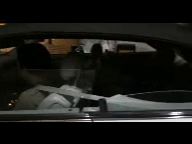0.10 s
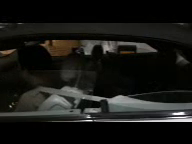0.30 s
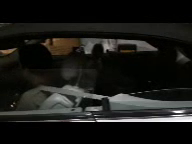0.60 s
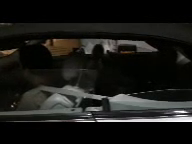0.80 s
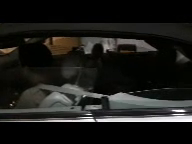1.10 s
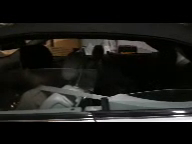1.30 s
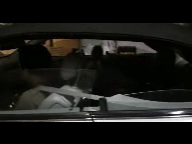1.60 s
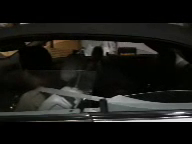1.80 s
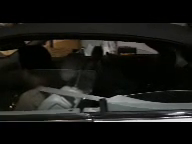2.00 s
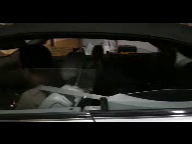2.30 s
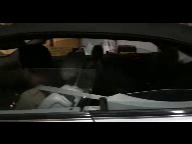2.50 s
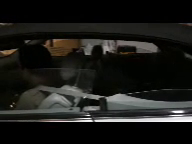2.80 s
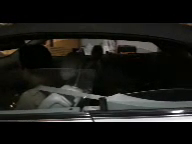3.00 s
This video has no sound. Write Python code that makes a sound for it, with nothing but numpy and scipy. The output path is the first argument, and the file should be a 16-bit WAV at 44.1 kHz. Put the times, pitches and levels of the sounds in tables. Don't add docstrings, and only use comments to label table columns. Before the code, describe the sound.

Silence until 0.13 s, then a quick fade into the steady whir of a car's folding roof motor: low hum, grainy gear chatter and a thin whine creeping upward. Dull linkage knocks at about 1.25 s, more with low scrapes around 1.8-2.1 s. A latch rattles at 2.96 s; the frame thuds at 3.05 s, bouncing briefly while the motor continues. Close, outdoors, small camera microphone.

```python
import sys
import numpy as np
from scipy import signal
from scipy.fft import rfft, irfft
from scipy.io import wavfile
from scipy.ndimage import uniform_filter1d

SR = 44100
rng = np.random.default_rng(int(sys.argv[2]) if len(sys.argv) > 2 else 0)


def output_pcm(signal):
    pcm = np.clip(np.atleast_2d(signal).T, -1, 1) * 32767
    wavfile.write(sys.argv[1], SR, np.round(pcm).astype(np.int16))


def gain_from_db(level_db):
    decades = np.asarray(level_db, float) / 20
    return 10 ** decades


N = 140679
T = np.arange(N) / SR

SHAFT_HZ = 40.6
# order (multiple of the shaft rate), level in dB rms.
SHAFT_ORDERS = [(1, -59), (2, -53), (3, -54.5), (4, -57), (6, -55), (7, -67.5), (12, -55), (15, -69)]
# frequency in Hz, level in dB rms.
HOUSING_TONES = [(212.5, -59.5), (257.5, -47.5), (425, -53.5), (660.5, -52.5), (1405, -51), (1754, -51.5)]
# time in seconds, pitch in Hz.
MESH_PITCH = [(0, 531), (.5, 531.5), (.9, 533.5), (1.5, 536.5), (2.1, 541.5), (2.45, 546), (3.19, 551)]
# order, time of greatest level in seconds, spread in seconds, level in dB rms.
MESH_PARTIALS = [(1, 2.42, 0.46, -49), (2, 1.8, 1, -52.5), (4, 0.99, 0.79, -52), (6, 1.4, 0.44, -57.5),
                 (11, 0.34, 0.2, -65), (11, 1.15, .2, -70)]
# frequency in Hz, spectral level in dB.
RUSH_SPECTRUM = [(30, -41), (70, -14.5), (200, -9), (600, -9.5), (1800, -7.5), (4600, -22), (5050, -27),
                 (9000, -32)]
# frequency in Hz, width in Hz, level in dB rms.
PANEL_MODES = [(271.3, 42, -50.5), (366, 39, -55), (496.2, 30.4, -49.5), (650.4, 45, -59), (3120, 680, -52),
               (893, 51, -57.5), (1241, 126, -45.5), (1382, 167, -43.5), (1644, 125, -45), (1802, 104, -44),
               (2153, 120, -52.5), (6960, 1300, -58.5), (8200, 970, -64)]
RUSH_DB, SWELL_DB, FLICKER_DB = -38, 0.74, 0.77
TICK_SPREAD_DB = 2.0
# start in seconds, length in seconds, level in dB, frequency in Hz, width in Hz.
JOINT_SCRAPES = [
    (1.76, 0.17, -47.5, 2900, 350),
    (1.895, 0.046, -38, 200, 260),
    (1.28, .05, -50, 4300, 300),
    (1.1, 0.1, -38, 220, 330),
    (1.78, 0.21, -42, 200, 170),
    (2.09, 0.092, -42, 92, 100),
    (2.956, .025, -42, 4650, 250),
    (2.958, 0.022, -41, 1200, 820),
    (3.04, 0.031, -30, 1850, 490),
    (3.041, 0.035, -30.5, 660, 100),
]
# start in seconds, level in dB, frequency in Hz, 60 dB decay in seconds, contact time in seconds.
LINKAGE_KNOCKS = [(1.243, -27.5, 400, 0.088, 0.0063), (1.3, -38.5, 400, 0.14, .008),
                  (1.272, -26.5, 183, 0.069, 0.0062), (1.847, -29.5, 94.7, 0.22, 0.0095),
                  (1.85, -35.5, 304, 0.14, 0.0052), (1.87, -36, 178, 0.087, .01),
                  (1.891, -29, 59.5, 0.14, 0.023), (1.94, -35.5, 85, 0.18, 0.015),
                  (1.98, -43, 64.7, 0.27, .015), (2.02, -35, 119, 0.098, 0.0094),
                  (2.12, -31.5, 253, 0.079, 0.0056), (1.245, -39, 230, .12, .008),
                  (1.99, -41, 50, 0.22, 0.022), (2.111, -43, 79, 0.24, 0.017),
                  (3.095, -30, 126.3, .2, .015), (3.14, -27, 129.4, .2, 0.015),
                  (3.165, -28, 120, 0.18, .01), (3.165, -29, 287, .12, 0.0092),
                  (3.115, -29, 308, .12, .008)]
RATTLE_START_S, RATTLE_LENGTH_S, RATTLE_DB = 2.957, 0.057, -33
# frequency in Hz, width in Hz, level in dB.
LATCH_MODES = [(610, 61, 5), (886, 370, -1.5), (1400, 490, 7), (2350, 660, -24), (4400, 210, -10),
               (5900, 300, -23)]
# frequency in Hz, level in dB, 60 dB decay in seconds.
FRAME_MODES = [(129.2, -7.5, 0.24), (153.8, 3.5, 0.13), (172, -3, 0.048), (217, -4.5, 0.23),
               (261.7, -1.5, 0.17), (307.7, -4, 0.18), (340.6, -7, 0.2), (400, -8.5, 0.25),
               (532, -10, 0.16), (628, -7, .1), (712, -12.5, 0.068), (891, -11, 0.091), (1067, -11.5, .06),
               (1280, -13, 0.061)]
# start in seconds, level in dB.
IMPACTS = [
    (3.041, -22.5),
    (3.048, -15.5),
    (3.059, -24.5),
    (3.075, -23.5),
    (3.106, -33.5),
    (3.122, -29.5),
    (3.17, -38),
]


def unit(x):
    return x / np.sqrt(np.mean(x ** 2))


def band(x, hz, width):
    return signal.lfilter(*signal.iirpeak(hz, hz / width, fs=SR), x)


def walk(rate):
    hold = int(SR / rate)
    steps = np.repeat(rng.standard_normal(N // hold + 1), hold)
    return 1.46 * uniform_filter1d(uniform_filter1d(steps, hold), hold)[:N]


def decay(u, t60):
    return np.exp(-np.log(1000) * u / t60)


def ring(start, hz, t60, contact, phase=0.):
    first = int(start * SR) + 1
    u = T[first:first + SR // 2] - start
    envelope = (1 - np.exp(-u / contact)) * decay(u, t60)
    out = np.zeros(N)
    out[first:first + len(u)] = envelope * np.sin(2 * np.pi * hz * u + phase)
    return out


def chatter():
    return rng.standard_normal(N) * gain_from_db(TICK_SPREAD_DB * rng.exponential(size=N))


def shaft():
    turn = 2 * np.pi * np.cumsum(SHAFT_HZ * (1 + 0.0017 * walk(1.866))) / SR
    out = 0
    for order, db in SHAFT_ORDERS:
        level = np.sqrt(2) * gain_from_db(db + 1.7 * walk(5.03))
        out = out + level * np.sin(order * turn + rng.uniform(0, 2 * np.pi))
    return out


def housing():
    out = 0
    for hz, db in HOUSING_TONES:
        level = np.sqrt(2) * gain_from_db(db + 2.18 * walk(14))
        out = out + level * np.sin(2 * np.pi * np.cumsum(hz + 4.98 * walk(16)) / SR)
    return out


def whine():
    hz = np.interp(T, *np.array(MESH_PITCH).T) * (1 + .0006 * walk(8))
    turn = 2 * np.pi * np.cumsum(hz) / SR
    out = 0
    for order, peak_s, spread_s, db in MESH_PARTIALS:
        shading = np.exp(-((T - peak_s) / spread_s) ** 4)
        out = out + np.sqrt(2) * gain_from_db(db + walk(12)) * shading * np.sin(round(order) * turn)
    return out


def gears():
    f = np.fft.rfftfreq(N, 1 / SR) + 1
    hz, db = np.array(RUSH_SPECTRUM).T
    spectrum = rfft(chatter()) * gain_from_db(np.interp(np.log(f), np.log(hz), db))
    rush = 0
    for octave in range(-1, 10):
        weight = np.clip(1 - abs(np.log2(f / 40) - octave), 0, 1)
        rush = rush + gain_from_db(FLICKER_DB * walk(12)) * irfft(spectrum * weight, N)
    panels = 0
    for hz, width, db in PANEL_MODES:
        wide = 1.38 * width
        tone = unit(band(band(chatter(), hz, wide), hz, wide))
        panels = panels + gain_from_db(db + FLICKER_DB * walk(6.08)) * tone
    return gain_from_db(SWELL_DB * walk(3.07)) * (gain_from_db(RUSH_DB) * unit(rush) + panels)


def scrapes():
    out = 0
    for start, length, db, hz, width in JOINT_SCRAPES:
        swell = np.sin(np.pi * np.clip((T - start) / length, 0, 1))
        out = out + gain_from_db(db) * unit(band(chatter(), hz, width)) * swell
    return out


def knocks():
    return sum(2 * gain_from_db(db) * ring(start, hz, t60, contact)
               for start, db, hz, t60, contact in LINKAGE_KNOCKS)


def rattle():
    u = (T - RATTLE_START_S) / RATTLE_LENGTH_S
    ticks = unit(chatter() * gain_from_db(walk(200)))
    burst = ticks * np.clip(np.minimum(u * 20, (1.4 - u) / 0.9), 0, 1)
    latch = sum(gain_from_db(db) * band(burst, hz, width) * np.sqrt(SR / 4 / width)
                for hz, width, db in LATCH_MODES)
    return gain_from_db(RATTLE_DB) * latch / 2


def landing():
    out = 0
    for start, db in IMPACTS:
        draws = rng.standard_normal((len(FRAME_MODES), 3))
        for (hz, mode_db, t60), (gain, detune, phase) in zip(FRAME_MODES, draws):
            mode = ring(start, hz * (1 + detune / 60), t60, .002, 2 * phase)
            out = out + gain_from_db(db + mode_db + 2 * gain) * mode
    u = np.clip(T - IMPACTS[0][0] + .002, 0, None)

    def burst(db, t60, hz, width):
        return gain_from_db(db) * unit(band(chatter(), hz, width)) * (1 - np.exp(-u / 0.0044)) * decay(u, t60)

    crack = band(burst(-26, 0.1, 1600, 1700), 1800, 2000)
    clatter = burst(-28, 0.27, 750, 440) + burst(-34, .4, 1500, 1300)
    boom = band(burst(-24, 0.54, 310, 300), 280, 400)
    return out + crack + clatter + boom


def scene():
    sharp = rattle() + landing()
    impact_band = signal.butter(4, (95, 4700), "band", fs=SR, output="sos")
    bumps = signal.sosfilt(impact_band, sharp)
    air = gain_from_db(-8) * band(band(sharp, 8100, 2800), 8100, 2800)
    return (shaft() + housing() + whine() + gears() + scrapes() + knocks() + bumps + air)[None]


def thin_treble(x):
    weak_bin, thrift, hole_share = .6, .6, .17
    edge_hz, edge_spread_hz = 9760, 380
    f, _, z = signal.stft(x, SR, "cosine", 1536)
    bins, frames = z.shape
    size = abs(z)
    thin = np.exp(-((f - 5200) / 650) ** 2) + np.clip((f - 8300) / 1000, 0, 1)
    limit = (weak_bin + thrift * thin[:, None] * rng.random(frames)) * (f[:, None] > 3000)
    weak = size < limit * uniform_filter1d(size, size=11, axis=0)
    busy = gain_from_db(np.clip(4 * walk(6)[::768], -9, 6))
    count = len(busy)
    draw = rng.random((bins // 6 + 1, frames // 2 + 1))
    draw = draw.repeat(6, axis=0).repeat(2, axis=1)
    holes = draw[:bins, :count] < hole_share * (thin + .04 * (f > 4000))[:, None] * busy
    dip = np.clip(rng.exponential(size=count) - .2, 0, 2.2).repeat(2)[:count]
    edge = edge_hz - edge_spread_hz * dip
    keep = (f[:, None] < edge) & ~(weak[:, :count] | holes)
    keep = np.pad(keep, ((0, 0), (0, frames - count)), mode="edge")
    return signal.istft(z * keep, SR, "cosine", 1536)[1][:N]


def roll_off(x):
    return signal.sosfilt(signal.butter(12, 9980, fs=SR, output="sos"), x)


def record(dry):
    opened = dry[0] * np.clip((T - 0.13) / 0.036, 0, 1) ** 0.53
    mix = thin_treble(opened)[None]
    return roll_off(mix)


dry = scene()
out = record(dry)
output_pcm(out)
```